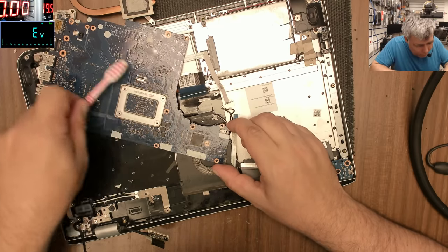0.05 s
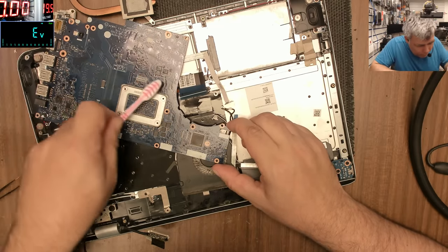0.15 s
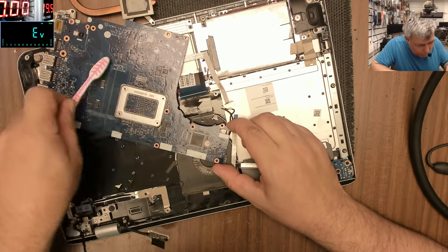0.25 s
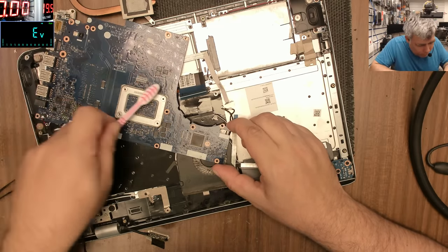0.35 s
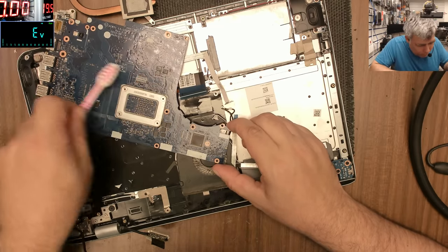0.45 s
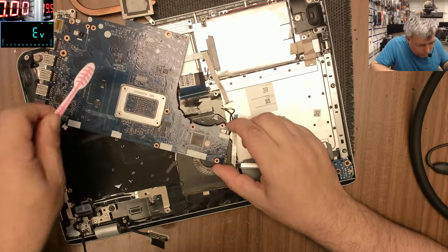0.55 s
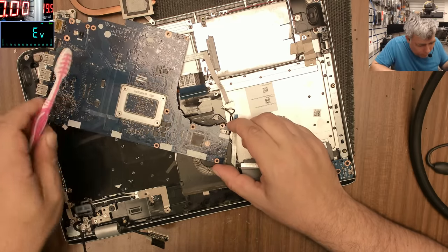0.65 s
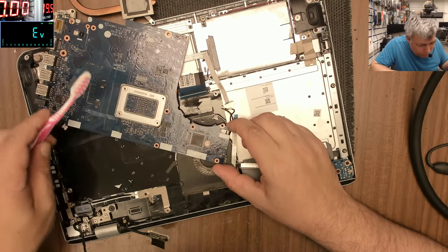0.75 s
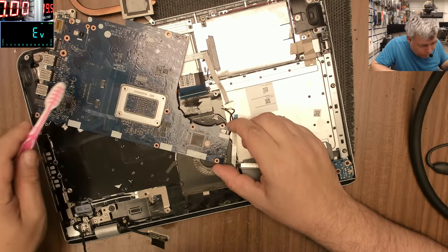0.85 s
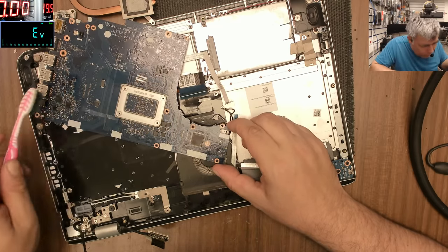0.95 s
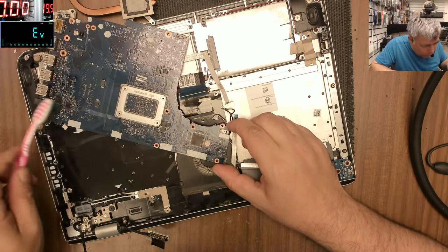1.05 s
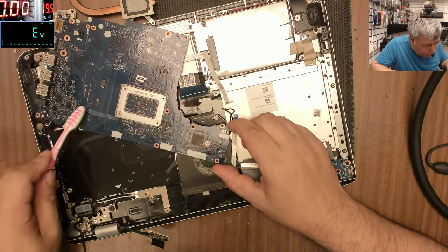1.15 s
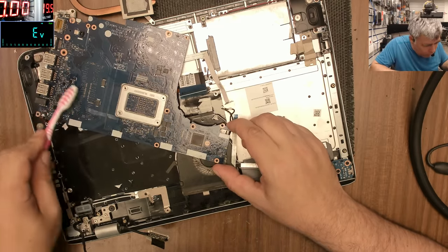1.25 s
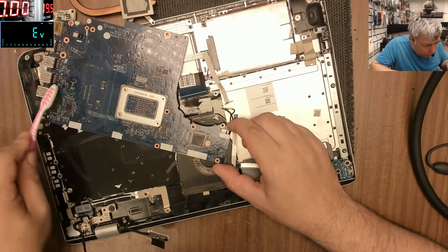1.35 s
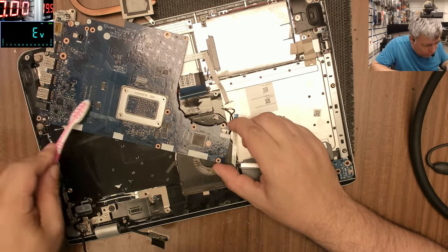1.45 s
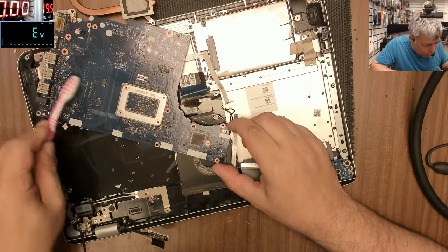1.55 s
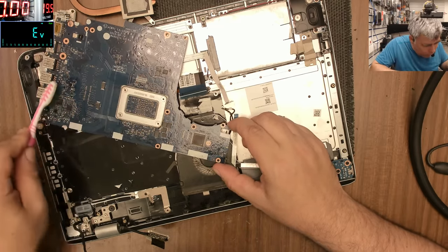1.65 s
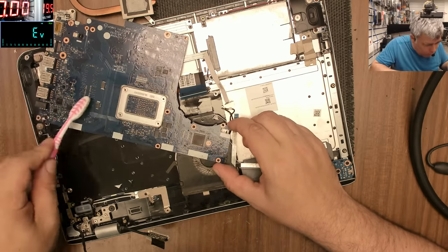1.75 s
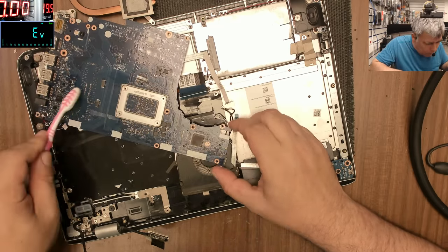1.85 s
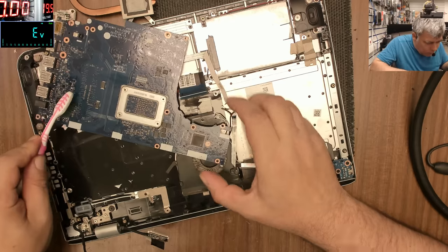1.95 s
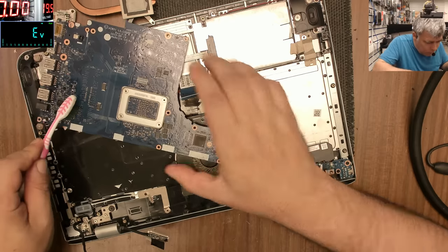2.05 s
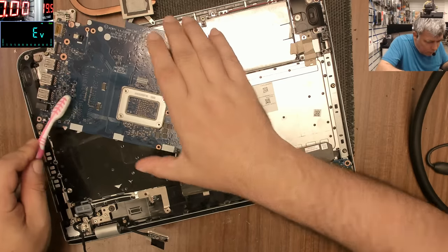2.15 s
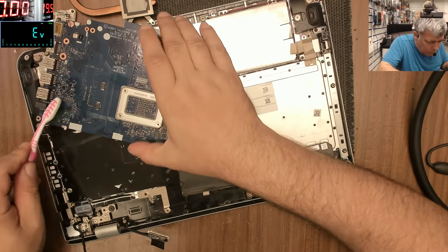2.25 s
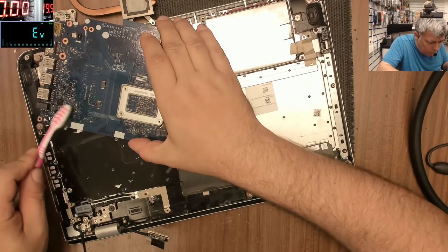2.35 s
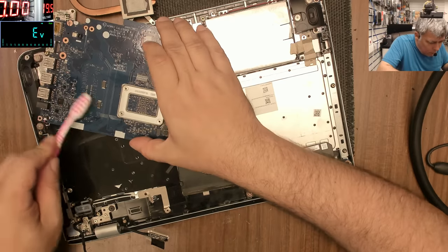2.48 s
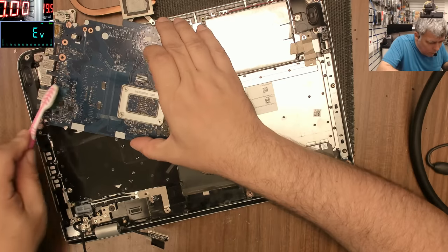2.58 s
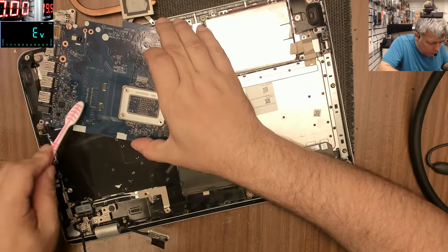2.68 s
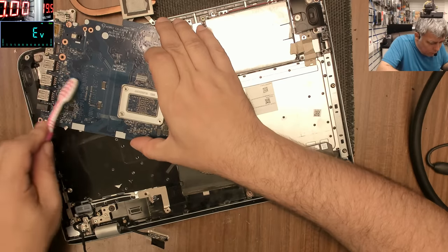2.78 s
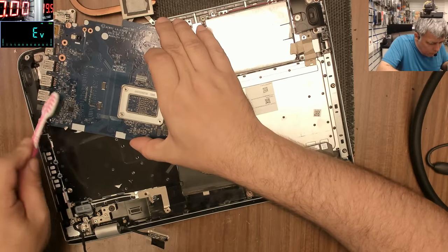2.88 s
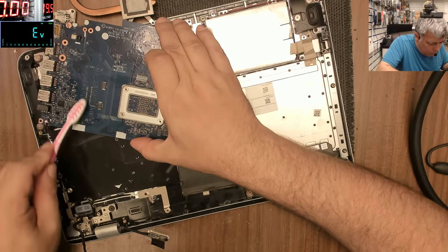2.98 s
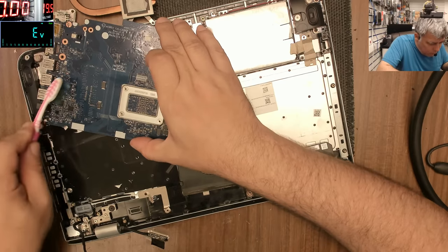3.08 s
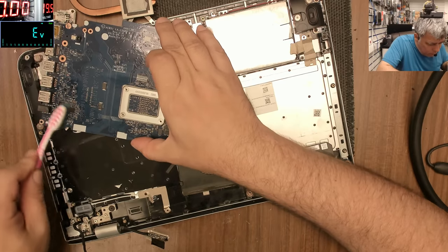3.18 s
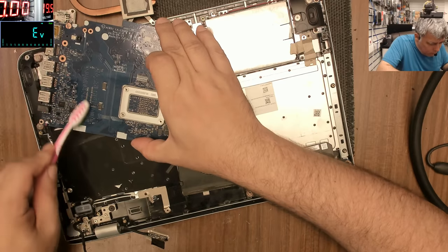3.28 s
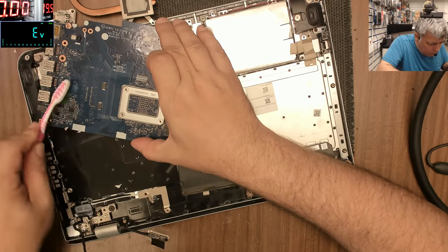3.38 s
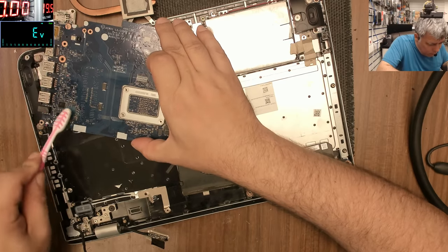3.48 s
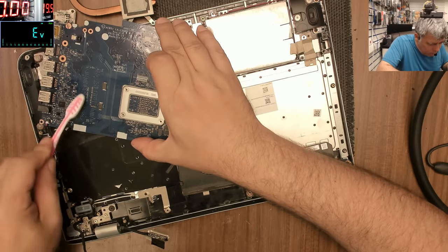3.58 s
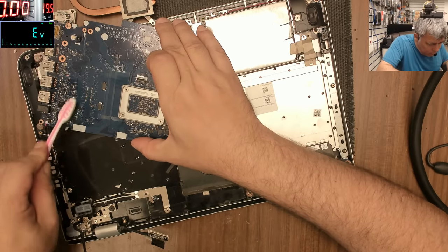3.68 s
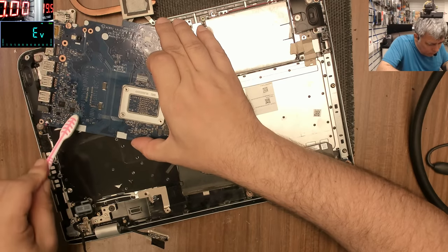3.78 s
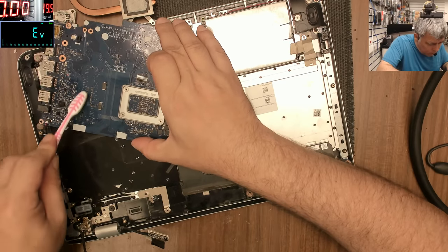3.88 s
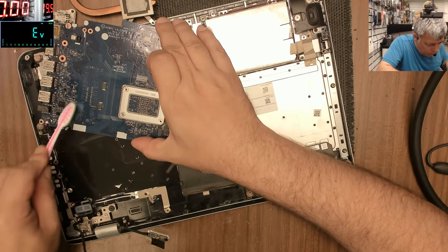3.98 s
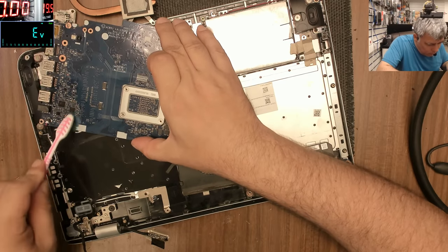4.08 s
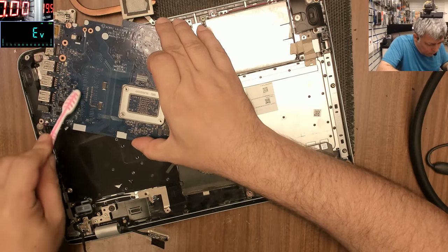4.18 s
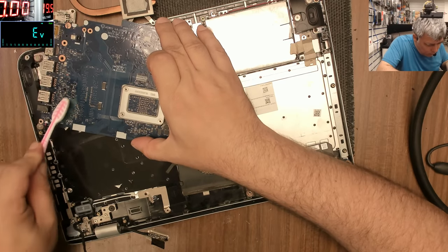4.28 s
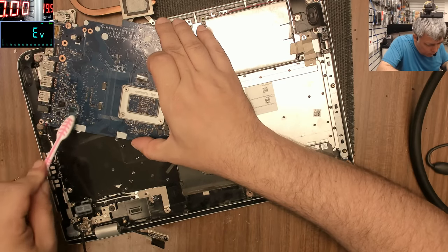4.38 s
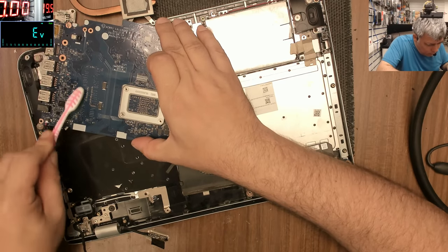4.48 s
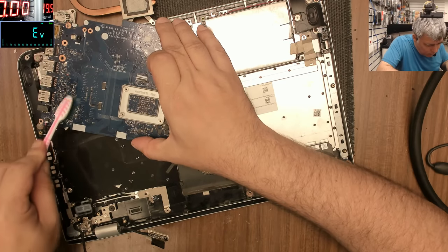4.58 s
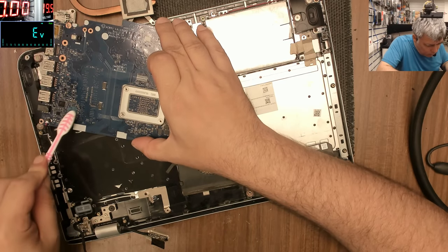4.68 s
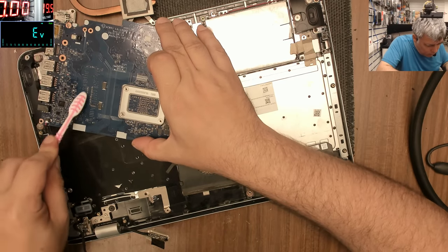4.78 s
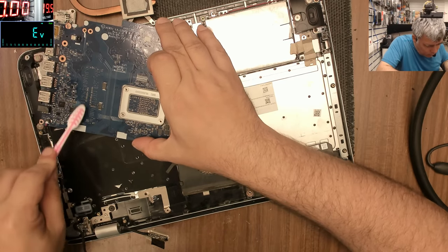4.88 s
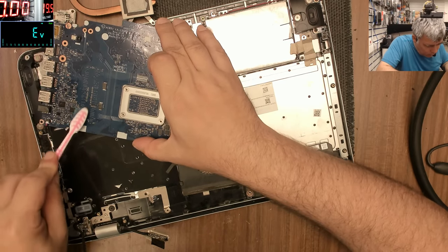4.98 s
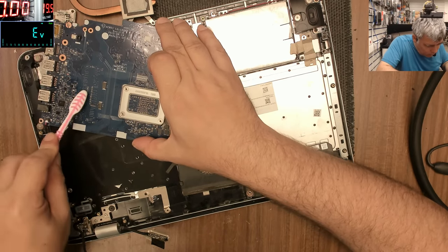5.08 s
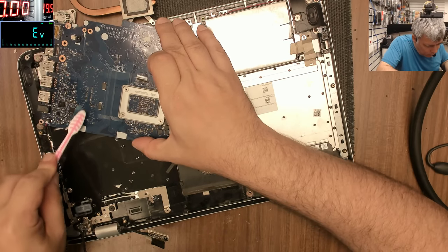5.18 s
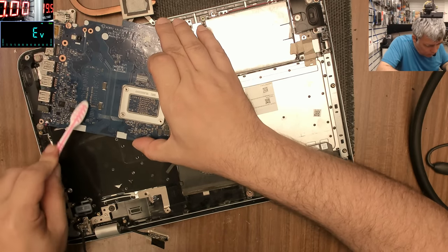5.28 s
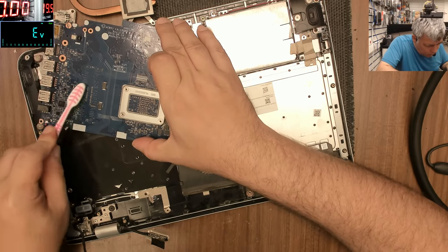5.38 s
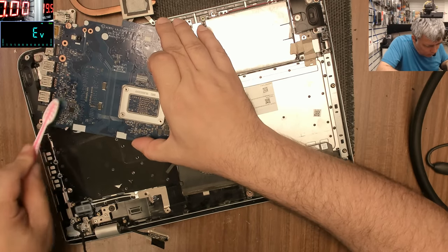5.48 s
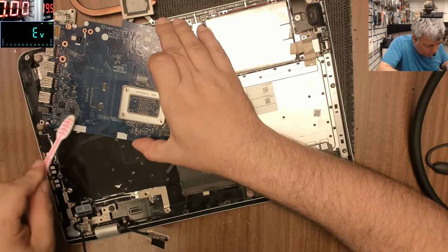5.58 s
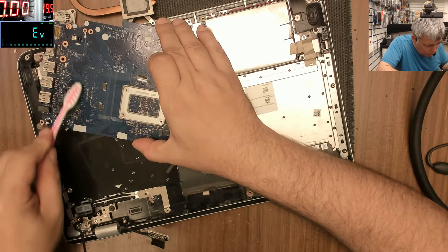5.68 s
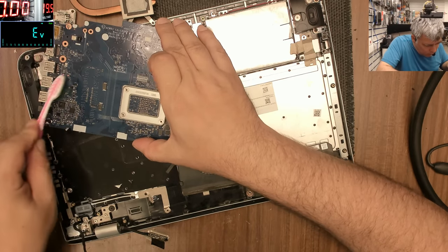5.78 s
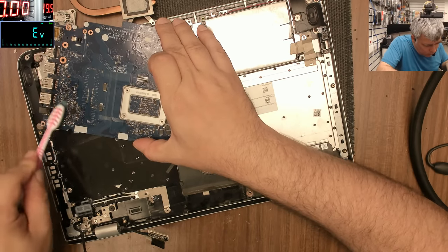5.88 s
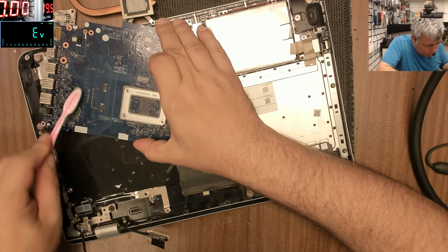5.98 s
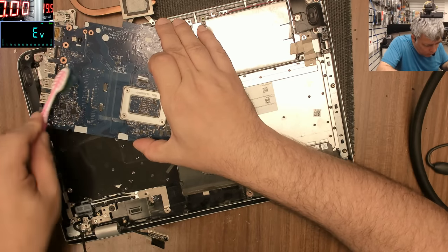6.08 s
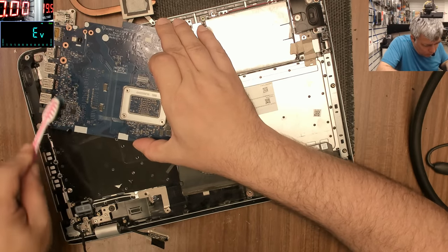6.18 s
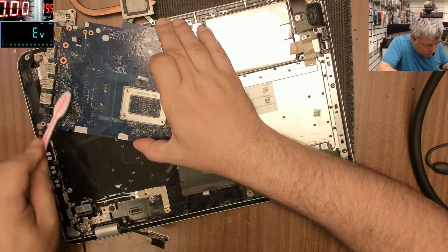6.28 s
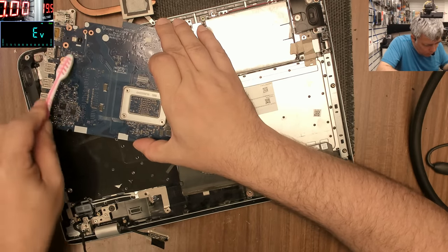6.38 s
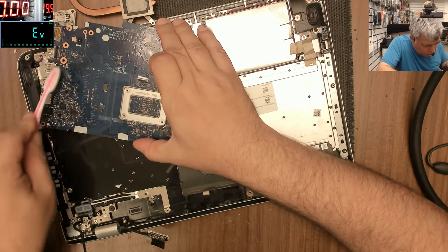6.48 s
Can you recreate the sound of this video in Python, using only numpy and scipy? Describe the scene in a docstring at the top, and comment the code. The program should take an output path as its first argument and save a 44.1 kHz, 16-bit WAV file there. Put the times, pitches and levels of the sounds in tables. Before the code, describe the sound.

Stiff bristles rasp over solder joints, each stroke a short gritty swish with a faint ringing of the board. Brief scrubbing, a pause, a few knocking strokes, another pause, then rhythmic scrubbing to the end with thin squeaks and muffled bench bumps. Quiet room, steady microphone hiss, close stereo pickup; a faint electrical whine appears with the brushing.

```python
"""First four quick brush strokes are heard over steady hiss; after about a second's pause the scrubbing returns.
A toothbrush scrubs a circuit board in an open laptop case on a workbench, about seven strokes a second.
Bristles flick over solder joints as random clicks that ring through the board; short wavering tones are squeaks.
The plastic head knocks on parts (noise bursts and dying tones), and the bench rumbles, sways and thuds.
A noise gate opens with the brushing and lets a thin electrical whine through."""
import sys
import numpy as np
from scipy import signal
from scipy.fft import rfft, irfft
from scipy.io import wavfile
from scipy.ndimage import uniform_filter1d

SR = 44100
rng = np.random.default_rng(int(sys.argv[2]) if len(sys.argv) > 2 else 0)


def dump_mix(stems):
    """Bounce the given channels to the path in sys.argv[1] as a 16-bit WAV at rate SR."""
    frames = np.atleast_2d(stems).T  # one column per channel
    limited = np.clip(frames, -1, 1)  # hard clip at full scale
    pcm = np.round(limited * 32767).astype(np.int16)
    wavfile.write(sys.argv[1], SR, pcm)


N = 288414


def from_db(db):
    """Turn decibels into a gain."""
    return 10 ** (np.asarray(db) / 20)


def rms_one(x):
    """Scale a sound to an average power of 1."""
    return x / np.sqrt(np.mean(x ** 2) + 1e-20)


def clock():
    """Time of every sample, in seconds."""
    return np.arange(N) / SR


def in_time(rows):
    """Read a (t/s, value) curve at every sample."""
    return np.interp(clock(), *np.transpose(rows))


def gain_per_bin(points):
    """Turn a (f/Hz, level/dB) curve into gains for the FFT."""
    hz, db = np.transpose(points)
    bins_hz = np.fft.rfftfreq(N, 1 / SR)
    return from_db(np.interp(np.log(bins_hz + 1), np.log(hz), db))


def colour(x, points):
    """Make some pitches stronger and others weaker, along a smooth curve."""
    return irfft(rfft(x) * gain_per_bin(points), N)


def drift(rate):
    """Chance wandering with spread 1: random values, 2 * rate a second, joined by straight lines."""
    position = clock() * 2 * rate
    knots = rng.standard_normal(N // 20)
    return rms_one(np.interp(position, np.arange(len(knots)), knots))


def stereo(mid, side):
    """Make left and right from the middle sound and its sideways part."""
    return np.array([mid + side, mid - side])


def resonate(x, hz, width):
    """Let one pitch ring; the gain at its peak is 1."""
    r = np.exp(-np.pi * width / SR)
    numerator = np.array([1, 0, -1]) * (1 - r * r) / 2
    denominator = [1, -2 * r * np.cos(2 * np.pi * hz / SR), r * r]
    return signal.lfilter(numerator, denominator, x)


def bandpass(low_hz, high_hz):
    """A filter that keeps the pitches between two limits."""
    return signal.butter(2, [low_hz, high_hz], "band", fs=SR, output="sos")


def add(out, s, sound):
    """Mix a short sound in at time s."""
    start = int(np.clip(s * SR, 0, N - 1))
    out[..., start:start + sound.shape[-1]] += sound[..., :N - start]


def dying(t, t60):
    """Fade that falls by 60 dB in t60 seconds."""
    return np.exp(-np.log(1000) * t / t60)


def ring_on(x, t60):
    """Countless close modes or echoes: a dying random response of unit energy."""
    t = np.arange(SR // 5) / SR
    response = rng.standard_normal(len(t)) * dying(t, t60)
    return signal.oaconvolve(x, response / np.sqrt(np.sum(response ** 2)))[:N]


# room tone and microphone hiss, relative strength by pitch: (f/Hz, level/dB)
FLOOR = [(12, 20.5), (22, 8), (34, -8), (48, 0), (65, 3), (105, 6.5), (180, 3.5), (300, -1), (600, -4.5),
         (1000, -8.5), (2000, -10), (6000, -9), (10000, -6.5), (15500, -3)]
# loudness of that background over time: (t/s, level/dB)
FLOOR_DB = [(0, -60), (.6, -59), (1.3, -61), (2.3, -61), (5.7, -62.5), (6.54, -60.5)]
# its width, sideways part against the middle: (f/Hz, level/dB)
FLOOR_WIDTH = [(30, -1), (120, -5.5), (500, -5.5), (2000, -3), (7000, -1.5), (7800, -27.5), (15000, -38.5)]


def background():
    """Shaped noise: room tone below, microphone hiss above."""
    mid, side = rms_one(colour(rng.standard_normal((2, N)), FLOOR))
    return from_db(in_time(FLOOR_DB)) * stereo(mid, colour(side, FLOOR_WIDTH))


def electrical_whine(hz=1401, level_db=-78):
    """A thin steady electrical tone: one sine wave."""
    return np.sqrt(2) * from_db(level_db) * np.sin(2 * np.pi * hz * clock())


# when the bristles lie on the board: (from t/s, to t/s)
CONTACT = [(-0.1, .437), (1.410, 1.975), (2.582, 5.683), (5.777, 6.7)]


def touching(ramp_s=0.0023):
    """1 while the bristles lie on the board, else 0, with short ramps between."""
    t = clock()
    return sum(np.clip((t - on) / ramp_s, 0, 1) * np.clip((off - t) / ramp_s + 1, 0, 1) for on, off in CONTACT)


# the arm presses the board down on the case: (t/s, thud level/dB, sway level/dB)
PRESSES = [(.055, -49.5, -41), (1.64, -56, -42), (1.75, -63, -48), (1.961, -55, -49.5), (2.58, -49, -61),
           (2.86, -58.5, -41), (3.23, -53.5, -37), (3.476, -48.5, -40), (3.534, -50, -41.5),
           (3.75, -49, -38.5), (4.04, -62, -37.5), (4.369, -67, -42.5), (4.568, -49, -49),
           (4.629, -55, -39), (4.903, -52, -41), (5.211, -51.5, -41.5), (5.338, -56.5, -42.5),
           (5.53, -64, -44), (5.843, -53.5, -42.5), (6.248, -67, -38.5)]
SWAY_LATE_S, SWAY_S = 0.027, 0.049   # the rocking peaks just after a press; its half length
SWAY_BRUSHING_DB, SWAY_SETTLE_S = -53.5, .1   # slight rocking all through the brushing; time to come and go


def sway(sway_hz=11, waver_hz=2.476):
    """The bench rocks under the moving arm, and more after each press: a very low wavering tone."""
    t = clock()
    brushing = uniform_filter1d(touching(), int(SWAY_SETTLE_S * SR))
    power = from_db(SWAY_BRUSHING_DB) ** 2 * brushing ** 2
    for s, _, db in PRESSES:
        distance = (t - s - SWAY_LATE_S) / SWAY_S
        power = power + from_db(db) ** 2 * np.exp(-np.minimum(distance ** 2, 20))
    phase = 2 * np.pi * np.cumsum(sway_hz + waver_hz * drift(3.4)) / SR
    return np.sqrt(2 * power) * np.sin(phase)


# handling rumble of the bench, relative strength by pitch: (f/Hz, level/dB)
RUMBLE = [(25, 0.5), (38, -12), (52, -5), (95, -0.5), (135, -13), (300, -28), (800, -43)]


def bench(rumble_db=-68, thud_hz=92, thud_t60=0.12):
    """The bench sways, rumbles under the brush and thuds with a dying low tone at each press."""
    mid, side = rms_one(colour(rng.standard_normal((2, N)) * touching(), RUMBLE))
    out = from_db(rumble_db) * stereo(mid, colour(side, BRUSH_WIDTH)) + sway()
    t = np.arange(SR // 3) / SR
    for s, db, _ in PRESSES:
        hz = thud_hz * np.exp(rng.normal(0, 0.053))   # each thud has a slightly different pitch
        add(out, s, from_db(db) * np.sin(2 * np.pi * hz * t) * dying(t, thud_t60))
    return out


# the head knocks on parts, and at 1.53 s a stroke gives a sharp scratch: (t/s, crack level/dB, ring level/dB,
# ring f/Hz)
KNOCKS = [(1.411, -57.5, -74, 1000), (1.479, -48, -60.5, 756), (1.53, -48, -80, 1370),
          (1.608, -49, -53.5, 780), (2.583, -52, -58, 580), (2.597, -43, -45, 1306),
          (2.815, -62, -60, 1290), (3.063, -67.5, -59.5, 1280), (3.467, -62, -62, 1470),
          (3.693, -60, -57.5, 1410), (4.326, -60, -63, 1380), (5.78, -52, -65, 1390),
          (6.211, -40.5, -40, 1078), (6.220, -40, -44, 1127)]
# what board and case ring with after a knock, relative strength: (f/Hz, level/dB, time to fall 60 dB t/s)
KNOCK_MODES = [(2670, -19, 0.063), (2890, -3, 0.021), (3770, -4.5, 0.047), (4500, -6.5, 0.022),
               (6460, -1, 0.036), (8600, -25, 0.018)]
# stiffer spots ring higher and longer: (f/Hz, time to fall 60 dB t/s)
RING_T60 = [(600, 0.026), (1130, 0.043), (1290, 0.081)]


def knocks(crack_t60=0.0057, crack_low_hz=2700, crack_high_hz=10500, modes_db=-6.0, build_s=0.00048, case_t60=0.044):
    """Hard plastic meets a part: a crack, the case's modes, and a low ring whose pitch depends on the spot."""
    out, t = np.zeros(N), np.arange(SR // 5) / SR
    band = bandpass(crack_low_hz, crack_high_hz)
    for s, crack_db, ring_db, ring_hz in KNOCKS:
        noise = rms_one(signal.sosfilt(band, rng.standard_normal(len(t))))
        crack = noise * dying(t, crack_t60)
        modes = np.zeros(len(t))
        for hz, db, life in KNOCK_MODES:
            strength = from_db(db + rng.normal(0, 2.1))   # no two knocks are quite alike
            modes += strength * np.sin(2 * np.pi * hz * t) * dying(t, life)
        t60 = np.interp(ring_hz, *np.transpose(RING_T60))
        build_up = 1 - np.exp(-t / build_s)
        ring = from_db(ring_db) * np.sin(2 * np.pi * ring_hz * t) * dying(t, t60) * build_up
        add(out, s, from_db(crack_db) * (crack + from_db(modes_db) * modes) + ring)
    return stereo(out, colour(ring_on(out, case_t60), BRUSH_WIDTH))


# near the free edge every stroke also squeaks faintly, just after its top speed
EDGE_FROM, EDGE_LATE_S = 0.76, .01   # place where this begins (0 inner board, 1 free edge); delay
EDGE_SQUEAK_HZ, EDGE_SCATTER_HZ, EDGE_SQUEAK_DB = 3930, 70.5, -66.5


def edge_squeaks():
    """List a faint squeak for each stroke near the free edge: (t/s, f/Hz, level/dB)."""
    found = []
    chance = rng.standard_normal(len(STROKES))
    for (s, _, _), luck in zip(STROKES, chance):
        if np.interp(s, *np.transpose(PLACE)) > EDGE_FROM:
            found.append((s + EDGE_LATE_S, EDGE_SQUEAK_HZ + EDGE_SCATTER_HZ * luck, EDGE_SQUEAK_DB))
    return found


# the loudest stick-slip squeaks: (t/s, f/Hz, level/dB)
SQUEAKS = [(.191, 6220, -57.5), (2.918, 3900, -62), (3.019, 4120, -54), (3.213, 3850, -62),
           (3.323, 3930, -59), (3.458, 3810, -62), (3.698, 5940, -58.5), (4.005, 3940, -52.5),
           (4.148, 3890, -62.5), (4.44, 4030, -56.5), (4.465, 3880, -56.5), (5.02, 6740, -61.5),
           (5.307, 3840, -56), (5.461, 6560, -59), (5.616, 3960, -61), (5.975, 3850, -54),
           (6.168, 3860, -55.5), (6.502, 4030, -60.5), (6.53, 4030, -56), (6.53, 6000, -58),
           (6.53, 3100, -60)]
SQUEAK_S = .015   # half length of a squeak


def squeaks(side_db=-9, waver_hz=50, waver_rate=150, rough=0.42):
    """For a moment the tufts stick and slip in step with one resonance: a short unsteady tone."""
    t = clock()
    waver = waver_hz * drift(waver_rate)
    grip = 1 + rough * np.tanh(drift(190))
    out = np.zeros((2, N))
    for s, hz, db in SQUEAKS + edge_squeaks():
        near = np.abs(t - s) < 3 * SQUEAK_S
        phase = 2 * np.pi * np.cumsum(hz + waver[near]) / SR
        bump = np.exp(-((t[near] - s) / SQUEAK_S) ** 2 / 2)
        swell = np.sqrt(2) * from_db(db) * bump * grip[near]
        out[:, near] += swell * stereo(np.sin(phase), from_db(side_db) * np.cos(phase))
    return out


def flicks(per_s, spread_db=1.0):
    """Single bristles snap free at random; more snaps a second make finer grain of the same power."""
    sizes = from_db(spread_db * np.minimum(rng.exponential(1, N), 5)) * rng.standard_normal(N)
    snaps = rng.random(N) < per_s / SR
    return rms_one(sizes * snaps / np.sqrt(per_s))


# brush strokes, level before the board's ringing: (t/s of top speed, length t/s, level/dB)
STROKES = [(0.084, 0.039, -53.5), (0.191, .058, -53.5), (.313, 0.053, -54), (0.417, 0.048, -51.7),
           (1.425, 0.04, -57.5), (1.528, 0.04, -58.5), (1.568, 0.079, -59.5), (1.69, 0.087, -58.5),
           (1.87, 0.088, -71), (2.63, .075, -57), (2.82, 0.15, -59), (2.909, .07, -56), (3.037, 0.12, -59),
           (3.162, 0.13, -55.5), (3.31, 0.088, -58), (3.433, 0.12, -57), (3.564, 0.081, -58.5),
           (3.7, 0.065, -57.5), (3.833, 0.085, -61.5), (3.988, 0.091, -55.5), (4.14, .12, -61.5),
           (4.299, .12, -58), (4.45, .1, -60), (4.583, .115, -59), (4.744, 0.099, -60), (4.884, 0.072, -59),
           (5.014, .095, -56.5), (5.161, .075, -59), (5.298, .11, -58.5), (5.456, .14, -58),
           (5.655, 0.25, -62), (5.801, 0.044, -56.5), (5.857, 0.075, -58), (5.986, .12, -58.5),
           (6.094, 0.082, -55), (6.177, 0.088, -58.5), (6.306, 0.13, -54.5), (6.478, 0.074, -57),
           (6.537, 0.079, -55)]
# steady drag of the bent bristles beneath the strokes: (t/s, level/dB)
DRAG = [(0, -61.5), (.12, -66), (.44, -65), (1.4, -63), (1.8, -68.5), (1.97, -69.5), (2.6, -63.5),
        (3.4, -70), (3.7, -69.5), (5.3, -74), (5.8, -67), (6.54, -67)]
# bristle friction, relative strength by pitch: (f/Hz, level/dB)
BRISTLES = [(150, -15.5), (400, -5), (750, -10.5), (1200, -10.5), (1800, -14.5), (2500, -10), (3400, -4),
            (4500, -1), (6800, -1.5), (9000, -1.5), (11000, -2.5), (12500, -11.5), (15500, -5.5)]
RISE_SHARE = .54   # part of a stroke spent speeding up
BODY_LOSS_DB_PER_S = 22.5   # longer strokes have less body


def friction(slow_per_s=5000, fast_per_s=16000, tuft_db=0.56, tuft_rate=70, steepness=2.5,
             drag_body_db=6.5, stroke_body_db=2.5, body_hz=3300):
    """Each stroke swells and fades; faster bristles flick louder and more often; short jabs have more body."""
    t = clock()
    power = from_db(in_time(DRAG)) ** 2
    body_power = power * from_db(drag_body_db) ** 2
    for s, length, db in STROKES:
        rise, fall = RISE_SHARE * length, (1 - RISE_SHARE) * length
        near = (t > s - 2 * rise) & (t < s + 2 * fall)
        travel = np.abs(t[near] - s) / np.where(t[near] < s, rise, fall)
        swell = from_db(db) ** 2 * np.exp(-2 * travel ** steepness)
        body_db = stroke_body_db - BODY_LOSS_DB_PER_S * length
        power[near] += swell
        body_power[near] += swell * from_db(body_db) ** 2
    flicks_per_s = slow_per_s + fast_per_s * np.sqrt(power / power.max())
    grains = rms_one(colour(flicks(flicks_per_s), BRISTLES))
    # the body is the part of the grain below body_hz
    body = signal.sosfiltfilt(signal.butter(2, body_hz, fs=SR, output="sos"), grains)
    grip = touching() * from_db(tuft_db * drift(tuft_rate))   # whole tufts catch and let go
    return grip * (body * np.sqrt(body_power) + (grains - body) * np.sqrt(power))


# resonances under the bristles: (f/Hz, width f/Hz, inner board level/dB, free edge level/dB)
BOARD = [(403.5, 8.4, 4, -1), (741, 23, 1, -6.5), (1057, 22, -4, 7), (1340, 127, 2, 7), (2276, 180, 7.5, 0),
         (3080, 70, 15, -13), (3900, 155, -18, 8), (5210, 200, -18, -1.5), (6040, 71, 1, 0),
         (6700, 470, -5.5, -7.5), (8460, 4000, -10.5, -22.5)]
# where the brush works: (t/s, place from 0 inner board to 1 free edge)
PLACE = [(0, 0.095), (.44, 0.28), (1.4, 0.61), (2.6, 0.48), (3.0, 0.63), (3.8, 0.95), (5.7, 0.8), (6.54, 1)]


def board(drive, shift_db=3.0, fine_db=-5.0, fine_t60=0.052, fine_low_hz=2200, fine_high_hz=8500):
    """Friction sounds through the board, whose resonances change with the place of contact."""
    out, place = drive, in_time(PLACE)
    for hz, width, inner_db, edge_db in BOARD:
        level_db = inner_db + place * (edge_db - inner_db) + shift_db * drift(5)
        out = out + resonate(drive * from_db(level_db), hz, width)
    # fine high modes: each spot under the brush wakes another set
    treble = signal.sosfilt(bandpass(fine_low_hz, fine_high_hz), drive)
    for spot in range(4):
        out = out + from_db(fine_db) * ring_on(treble * drift(4) / 2, fine_t60)
    return out


# width filter for the sideways part of brush, knocks and rumble: (f/Hz, level/dB)
BRUSH_WIDTH = [(30, 1), (100, -8.5), (500, -12), (1500, -20), (2800, -19), (4000, -9.5), (7000, -7.5),
               (7800, -39), (15000, -51)]


def scrubbing(diffuse_db=-2.5, left_lead=1.0):
    """The bristles are heard directly, a little sooner on the left, and with unrelated grain by way of bench and case."""
    direct, diffuse = board(friction()), board(friction())
    lead = left_lead * np.gradient(direct)   # adding the slope moves a sound slightly earlier
    return stereo(direct, colour(from_db(diffuse_db) * diffuse + lead, BRUSH_WIDTH))


def gate(sound, closed_db=-19, threshold_db=-84, window_s=.008):
    """Gain of a noise gate that is open while the sound is over its threshold."""
    size = int(window_s * SR)
    power = uniform_filter1d(sound.mean(axis=0) ** 2, size)
    is_open = power > from_db(threshold_db) ** 2
    openness = uniform_filter1d(is_open * 1.0, size)
    return from_db(closed_db * (1 - openness))


def scene():
    """Brush and whine pass the gate; bench and background lie under them."""
    brush = scrubbing() + squeaks() + knocks()
    return gate(brush) * (brush + electrical_whine()) + bench() + background()


def record(dry, cutoff_hz=15700):
    """A steep filter removes the highest treble."""
    return signal.sosfilt(signal.ellip(12, .1, 80, cutoff_hz, fs=SR, output="sos"), dry)


dry = scene()
out = record(dry)
dump_mix(out)
```